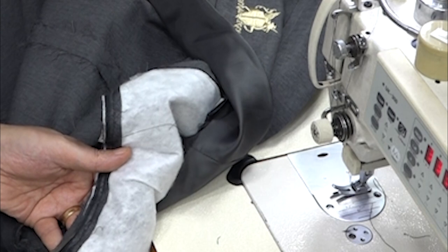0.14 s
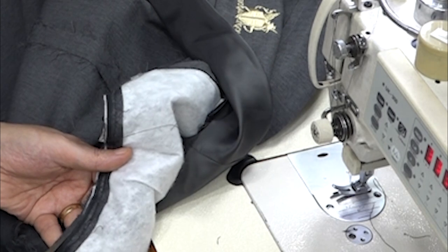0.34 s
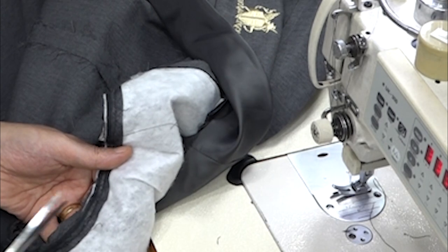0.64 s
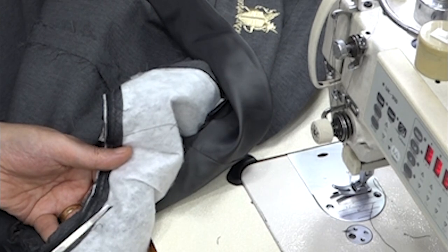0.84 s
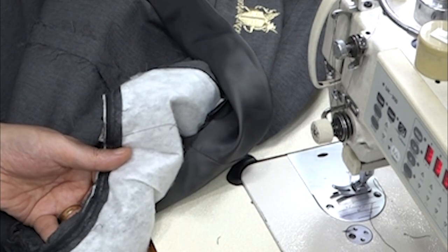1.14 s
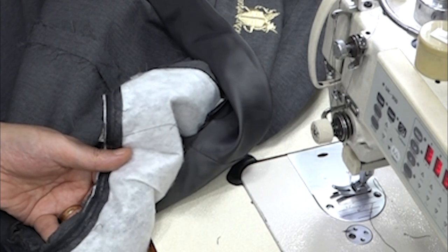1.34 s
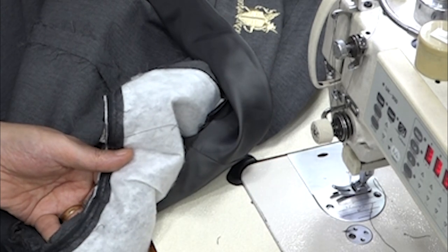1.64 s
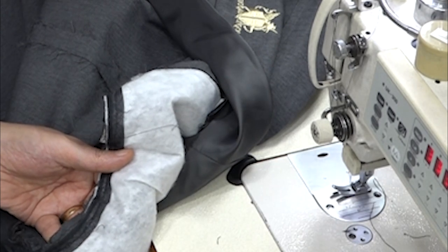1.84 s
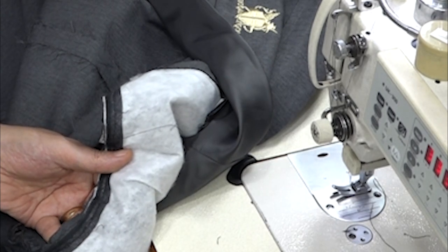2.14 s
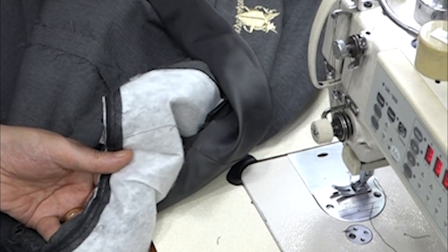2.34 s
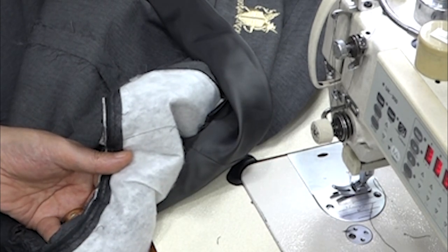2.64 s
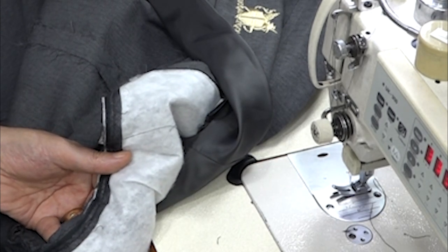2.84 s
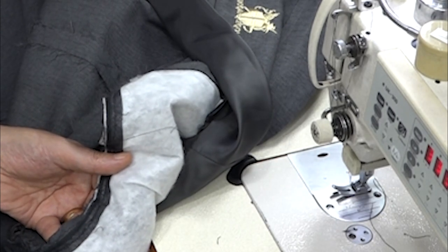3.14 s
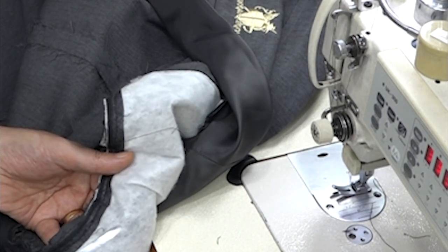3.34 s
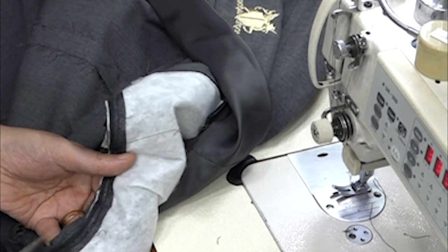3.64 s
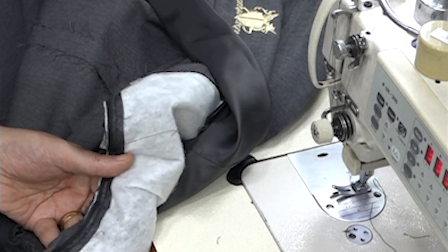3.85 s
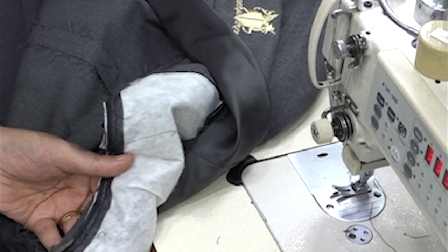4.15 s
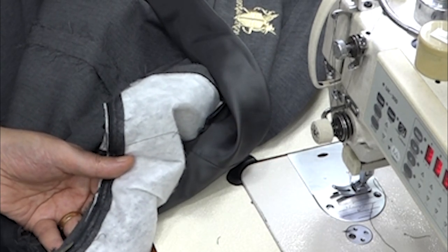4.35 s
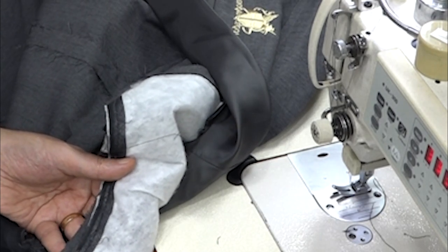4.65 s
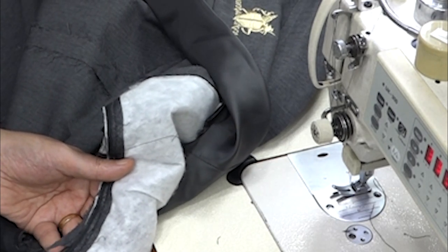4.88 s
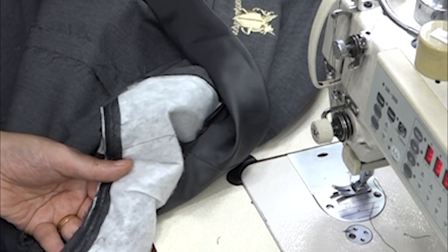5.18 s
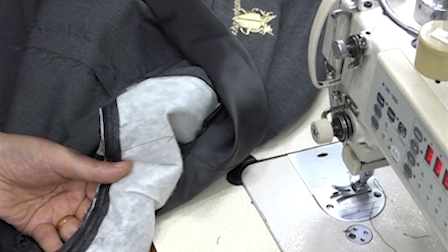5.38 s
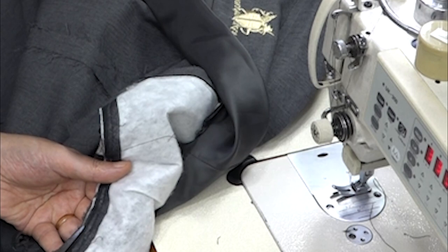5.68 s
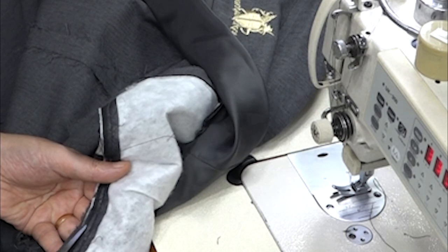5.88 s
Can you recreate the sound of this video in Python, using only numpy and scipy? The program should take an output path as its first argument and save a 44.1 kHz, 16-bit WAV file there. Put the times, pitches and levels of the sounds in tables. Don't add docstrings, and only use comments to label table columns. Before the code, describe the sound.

Close stereo microphone in a small workshop. Large steel scissors make three bright, ringing snaps in the first second, reopening with lighter ticks. After a pause comes a faint snap, then the hardest one with a short cloth drag, then three quick cuts with sliding edges and tiny squeaks. One last cut follows late. A low motor hum and soft airy noise run throughout.

```python
import sys
import numpy as np
from scipy import signal
from scipy.fft import rfft, irfft
from scipy.io import wavfile

SR = 44100
rng = np.random.default_rng(int(sys.argv[2]) if len(sys.argv) > 2 else 0)


def undo_db(level):
    steps = np.asarray(level, float) / 20
    return 10 ** steps


def unload_wav(signal):
    wavfile.write(
        sys.argv[1],
        SR,
        np.round(np.clip(np.atleast_2d(signal).T, -1, 1) * 32767).astype(np.int16),
    )


N = 265305
STEADY_CUT_HZ = 15720


def at_hz(points, hz):
    table_hz, value = np.transpose(points)
    return np.interp(np.log(hz), np.log(table_hz), value)


def at_s(rows, s):
    return np.interp(s, *np.transpose(rows))


def rms_one(x):
    return x / np.sqrt(np.mean(x ** 2) + 1e-20)


def coloured(x, *spectra):
    hz = np.fft.rfftfreq(len(x), 1 / SR) + 1
    return irfft(rfft(x) * undo_db(sum(at_hz(s, hz) for s in spectra)), len(x))


def drift(rate_hz):
    knots = rng.standard_normal(400)
    return np.interp(np.arange(N) / SR * rate_hz, np.arange(400), knots)


# f/Hz, side minus mid/dB
WIDTH = [(30, -36), (110, -44), (200, -38), (380, -21), (700, -17), (1290, -15), (2380, -15.5), (3400, -16),
         (4400, -16.5), (6000, -14), (8120, -9.5), (11000, -3), (13000, 2), (15500, 6)]


def diffuse(spectrum, size):
    mid, side = rng.standard_normal((2, size))
    mid, side = coloured(mid, spectrum), coloured(side, spectrum, WIDTH)
    return np.array([mid + side, mid - side])


# f/Hz, width/Hz, level above (or below) the noise/dB
WHINES = [(93.5, 11, -14), (110.3, 5.9, 6), (4340, 70, 4), (5530, 40, 5), (6230, 80, 3), (6930, 30, 4),
          (7080, 80, 4), (8920, 100, 4), (10370, 50, 6), (10620, 80, -4), (11960, 60, 5), (12780, 100, 3),
          (12990, 60, -5), (13350, 50, 5)]


def whining(x):
    ripple_db, ripple_step_hz, ripple_from_hz = 2.2, 55, 2500
    hz = np.fft.rfftfreq(N, 1 / SR)
    comb = np.interp(hz / ripple_step_hz, np.arange(1000), rng.standard_normal(1000))
    comb_db = ripple_db * comb * np.clip(hz / ripple_from_hz - 1, 0, 1)
    humps_db = sum(db * np.exp(-(2 * (hz - top_hz) / width_hz) ** 2) for top_hz, width_hz, db in WHINES)
    return irfft(rfft(x) * undo_db(humps_db + comb_db) * (hz < STEADY_CUT_HZ), N)


# f/Hz, density/dB per Hz
AIR = [(15, -31), (60, -7.5), (150, -8), (230, -8.5), (320, -13.5), (600, -11.5), (1140, -18), (2010, -21),
       (4050, -30.5), (7300, -29), (9500, -33), (13200, -34.5), (14500, -43), (15700, -44)]


def room_noise():
    air_db_rms = -33.5 + 0.5 * drift(7.2)
    return undo_db(air_db_rms) * rms_one(whining(diffuse(AIR, N)))


HUM_HZ = [28, 60.1, 63.4, 72.7, 97.9, 120.03, 130.8, 142.2, 162.9, 240.1, 360.1, 382.2, 457, 840, 1701]
HUM_DB = [-58, -54, -53, -50, -41.5, -40, -52, -40.5, -55, -54, -55, -56, -57, -59, -62]


def motor():
    t = np.arange(N) / SR
    hum = np.zeros(N)
    for hz, db in zip(HUM_HZ, HUM_DB):
        height = np.sqrt(2) * undo_db(db + 1.2 * drift(6))
        cycles = hz * t + rng.random() + 0.02 * drift(5)
        hum += height * np.sin(2 * np.pi * cycles)
    return hum


# f/Hz, level/dB
ECHO = [(1500, -14), (3000, -12), (3800, -11), (4500, -7), (7000, -9.5), (9000, -12), (12000, -7.5)]
# f/Hz, t60/s
ECHO_T60 = [(2500, 0.34), (6000, 0.24), (9000, 0.23), (15000, 0.17)]


def workshop(x):
    size = SR // 2
    t, tail = np.arange(size) / SR, 0
    edges_hz = 1400 * 2 ** np.arange(0, 3.8, 0.5)
    noise = diffuse(ECHO + [(STEADY_CUT_HZ, -14), (STEADY_CUT_HZ + 30, -90)], size)
    for low, high in zip(edges_hz, edges_hz[1:]):
        band = signal.sosfilt(signal.butter(2, [low, high], "band", fs=SR, output="sos"), noise)
        tail = tail + band * undo_db(-60 * t / at_hz(ECHO_T60, np.sqrt(low * high)))
    tail = tail * np.clip((t - 0.003) / 0.002, 0, 1)
    tail = tail / np.sqrt(np.sum(tail ** 2) / 2)
    return signal.fftconvolve(x[None], tail, axes=1)[:, :N]


def gain_db(s):
    open_db, duck_s, step_db, duck_db, duck_time_s = 0.7, 2.312, -9.5, -18.2, 0.024
    creep_db_per_s, wait_s, creep_top_db = 5.7, 0.07, 15.8
    since = np.asarray(s) - duck_s
    step = np.clip(since / 0.002, 0, 1) * step_db
    ramp = np.clip(since / duck_time_s, 0, 1) * (duck_db - step_db)
    waited = sum(np.clip(s - snap[0], 0, wait_s) for snap in SNAPS if snap[0] > duck_s + 0.1)
    creeping_s = np.maximum(since - duck_time_s - waited, 0)
    return open_db + step + ramp + np.minimum(creep_db_per_s * creeping_s, creep_top_db)


def ring(clicks, hz, t60_s):
    r, w = undo_db(-60 / (t60_s * SR)), 2 * np.pi * hz / SR
    return signal.lfilter([0, np.sin(w)], [1, -2 * r * np.cos(w), r * r], clicks + 1e-18)


def rasp(noise):
    return rms_one(signal.sosfilt(signal.butter(3, [4400, 12000], "band", fs=SR, output="sos"), noise))


# t/s, metered tick level/dB, strongest ring f/Hz, slide level at snap/dB
CLOSINGS = [
    (2.3196, -40, 6800, -58),
    (2.7330, -32, 7950, -45),
    (3.0267, -26.5, 7960, -44),
    (3.3026, -24.5, 6800, -43),
    (4.680, -35, 9700, -45),
]
# t/s, metered tick level/dB, strongest ring f/Hz, slide level/dB
OPENINGS = [
    (.519, -30, 7900, -43),
    (0.9962, -27, 6850, -47),
    (2.6345, -33, 7950, -53),
    (2.93, -28.5, 7600, -50),
    (3.2195, -29.5, 7250, -45),
    (3.5078, -39, 7900, -49),
    (4.585, -48, 8000, -51),
    (4.878, -46, 8000, -48),
]


def strokes():
    out = [[(2.339, -43), (2.405, -38), (2.445, -58)]]
    lead_s, rise_db_per_s = 0.004, 210
    for s, _, _, db in CLOSINGS:
        start, end = s - lead_s, min(snap[0] for snap in SNAPS if snap[0] > s)
        out.append([(start, db - rise_db_per_s * (end - start)), (end, db)])
    for s, _, _, db in OPENINGS:
        out.append([(s - 0.018, db - 7), (s, db), (s + 0.032, db - 10)])
    return out


def slides():
    t, level = np.arange(N) / SR, np.zeros(N)
    for rows in strokes():
        inside = np.clip(np.minimum(t - rows[0][0], rows[-1][0] - t) / 0.0031, 0, 1)
        level += inside * undo_db(at_s(rows, t) - gain_db(t))
    grit = rng.standard_normal((3, N)) * undo_db(1.5 * drift(65))
    rings = np.zeros(N)
    for k, (hz, db, t60_s) in enumerate(BLADES):
        rings += undo_db(0.85 * db) * rms_one(ring(grit[k % 3], hz, t60_s))
    return level * rms_one(rms_one(rings) + 0.6 * rasp(grit.sum(axis=0)))


# t/s, f/Hz, metered peak level/dB, t60/s
ACCENTS = [(.0552, 4330, -24, 0.014), (0.0558, 9480, -22, 0.013), (.8149, 6400, -13.5, 0.007),
           (.8149, 3600, -30, .01), (.815, 9400, -18, .008), (.538, 6900, -34, .01),
           (.524, 6750, -33, .012), (.9965, 9350, -32, .01), (1.168, 6150, -13.5, 0.0088),
           (1.1673, 3400, -25.5, 0.012), (2.3271, 2550, -18, .005), (2.3274, 1590, -26, 0.0034),
           (2.3272, 5000, -12, .0022), (2.3277, 10700, -8, 0.005), (2.3273, 950, -21, .002),
           (2.3274, 9300, -8, .006), (2.749, 6540, -45, .015), (2.7585, 3750, -37, 0.025),
           (2.7586, 7840, -16, 0.015), (2.946, 7500, -36, .01), (3.046, 11700, -13, 0.0089),
           (3.3203, 3800, -31, 0.022), (3.3195, 2350, -50, 0.011), (4.7268, 4460, -21, 0.009),
           (4.7276, 5700, -16, 0.006), (4.7274, 9900, -8, .005), (4.7274, 7300, -22, 0.01)]
# t/s, metered peak level/dB
SQUEAKS = [
    (2.7335, -37),
    (3.041, -38),
    (3.315, -40),
    (4.684, -37),
    (4.70, -41),
]
# f/Hz, level against the tick/dB
PIVOT = [
    (3180, -11),
    (4660, -9),
    (6100, -7),
]


def accents():
    squeak_hz, squeak_t60_s, pivot_t60_s = 11550, 0.011, 0.011
    squeaks = [(s, squeak_hz, db, squeak_t60_s) for s, db in SQUEAKS]
    pivots = [(s, hz, db + less_db, pivot_t60_s) for s, db, _, _ in OPENINGS for hz, less_db in PIVOT]
    rows = ACCENTS + squeaks + pivots
    out, t = np.zeros(N), np.arange(1400) / SR
    for s, hz, db, t60_s in rows:
        rubbing_ms = 0.8 - 0.05 * db
        rub = rng.standard_normal(len(t)) * np.exp(-(t * 1000 / rubbing_ms) ** 2)
        sound, at = ring(rub, hz, t60_s), round(s * SR)
        out[at:at + len(t)] += undo_db(db - gain_db(s)) * sound / np.abs(sound).max()
    return out


# f/Hz, level/dB, t60/s
BLADES = [(2350, -23, 0.017), (3150, -21, .006), (3960, -13, 0.036), (4495, -4, 0.012),
          (5400, -5.5, 0.0067), (6100, -3, 0.011), (6880, 0.5, 0.015), (7500, 3.5, 0.013), (7950, 4.5, .01),
          (8790, 3, 0.0098), (9100, 0.5, 0.013), (9420, -5, 0.014), (10600, -4, 0.0029),
          (11600, -2.5, 0.016), (12700, -11, 0.012), (13500, -10, 0.0038), (15700, -12, .004)]


def snip(peak_hz, low_db, high_db, chatter_ms):
    t = np.arange(1400) / SR
    chatter = np.minimum(t / 0.00048, 1) * np.exp(-(t * 1000 / chatter_ms) ** 2)
    crack, *blows = rng.standard_normal((len(BLADES) + 1, len(t))) * chatter
    out = undo_db(1.5) * rasp(crack)
    for (hz, db, t60_s), blow in zip(BLADES, blows):
        near_db = 9 * np.exp(-((hz - peak_hz) / 600) ** 2)
        low_share = np.clip((7000 - hz) / 2000, 0, 1)
        range_db = (low_db + 3.5) * low_share + (high_db + 6.5) * (hz > 9200)
        out = out + undo_db(db + near_db + range_db) * rms_one(ring(blow, hz, t60_s))
    return rms_one(out) * np.sqrt(chatter_ms) * 0.08


# t/s, metered peak level/dB, strongest ring f/Hz, low rings/dB, high rings/dB
SNAPS = [(0.0548, -12.5, 8040, -4, -15), (0.815, -10.5, 8340, -17, -4), (1.1669, -7.5, 6750, -16, -26),
         (2.1705, -17, 6860, -12, -19), (2.3269, 1.5, 9250, -6, -2.5), (2.3320, -14, 8500, -4, -10),
         (2.7587, -6, 9100, -21, 1), (3.0462, -5, 9050, -10, 0.5), (3.0489, -16, 8900, -10, -4),
         (3.3199, -4, 9250, -21, 1), (3.3223, -6.5, 7950, -26, -16), (4.7274, -2, 9550, -15, -2)]


def contacts():
    meet_low_db, meet_high_db = 1, -4
    open_low_db, open_high_db = -12, -6
    unstick_lead_s, unstick_db = 0.014, -12
    meets = [(s, db, hz, meet_low_db, meet_high_db) for s, db, hz, _ in CLOSINGS]
    opens = [(s, db, hz, open_low_db, open_high_db) for s, db, hz, _ in OPENINGS]
    unsticks = [(s - unstick_lead_s, db + unstick_db, *colour) for s, db, *colour in opens]
    return SNAPS + meets + opens + unsticks


def snips():
    out = np.zeros(N)
    for s, db, *colour in contacts():
        chatter_ms = 1.4 - 0.07 * db
        sound, at = snip(*colour, chatter_ms), round(s * SR)
        out[at:at + len(sound)] += undo_db(db - gain_db(s)) * sound
    return out


# t/s, left minus right level/dB
PAN = [
    (0, -2.5),
    (2.3, 2.5),
    (2.8, -1),
    (3.4, -1),
    (4.7, 1),
]


def scene():
    left_right = np.array([[1], [-1]])
    shears = snips() + accents() + slides()
    thin_blades = signal.butter(3, 1600, "high", fs=SR, output="sos")
    shears = signal.sosfilt(thin_blades, shears)
    off_axis = np.roll(shears, 1) - np.roll(shears, -1)
    pan_db = at_s(PAN, np.arange(N) / SR) / 2 * left_right
    near = (shears + 0.096 * off_axis * left_right) * undo_db(pan_db)
    echo = undo_db(-9.5) * workshop(shears)
    hum = motor() * undo_db(0.07 * left_right)
    return near + echo + hum + room_noise()


def roll_off(x):
    return signal.sosfilt(signal.butter(12, 16810, fs=SR, output="sos"), x)


def record(dry):
    levelled = dry * undo_db(gain_db(np.arange(N) / SR))
    rounded = 0.95 * np.tanh(levelled / 0.95)
    top_cut = signal.cheby1(8, 0.5, 15600, fs=SR, output="sos")
    return roll_off(signal.sosfilt(top_cut, rounded))


dry = scene()
out = record(dry)
unload_wav(out)
```